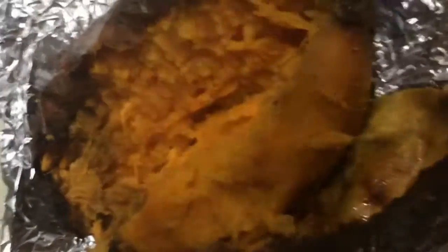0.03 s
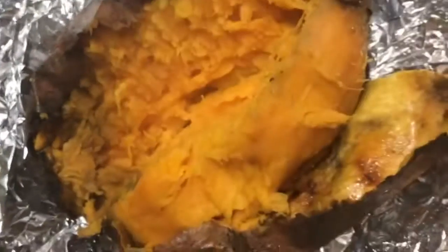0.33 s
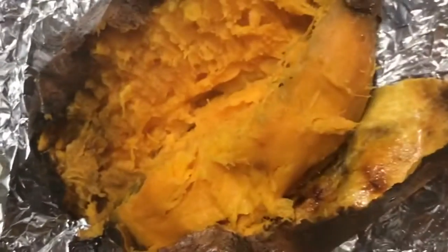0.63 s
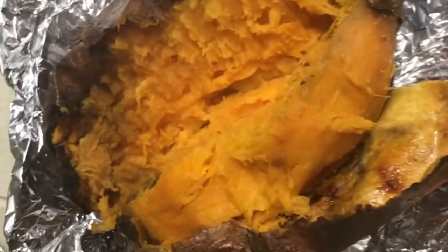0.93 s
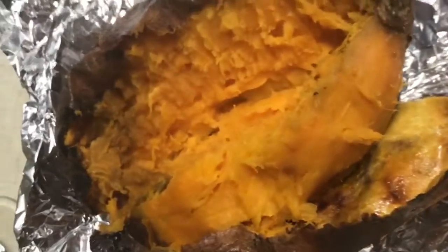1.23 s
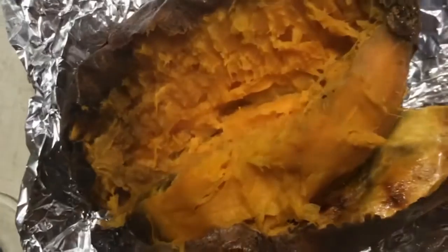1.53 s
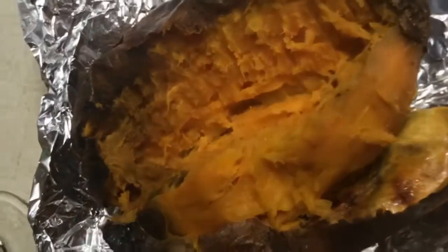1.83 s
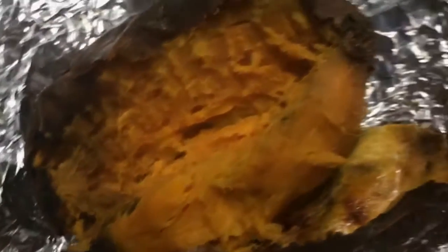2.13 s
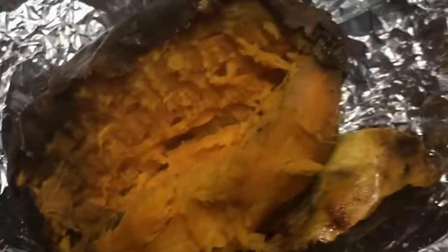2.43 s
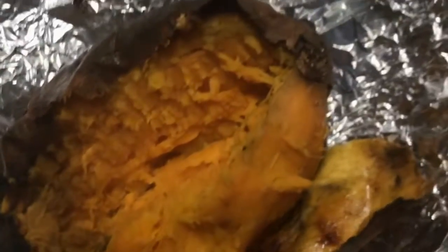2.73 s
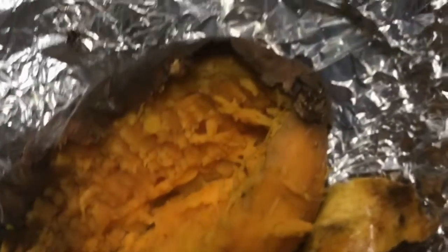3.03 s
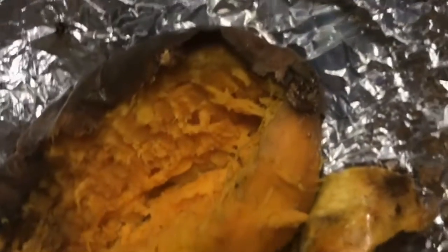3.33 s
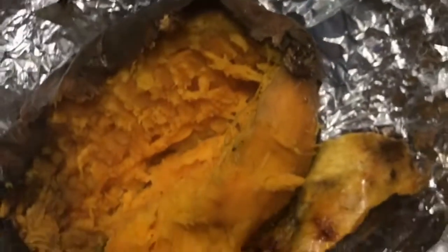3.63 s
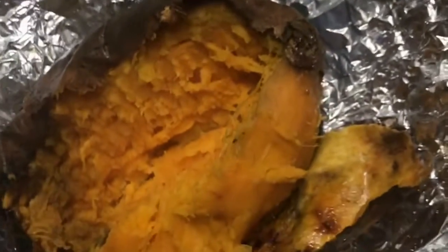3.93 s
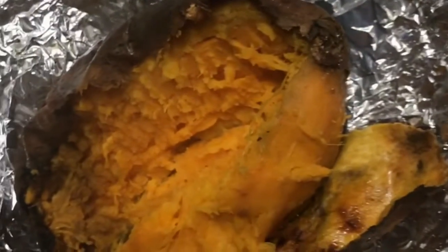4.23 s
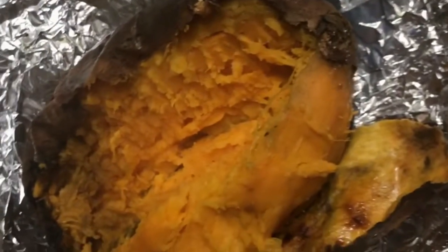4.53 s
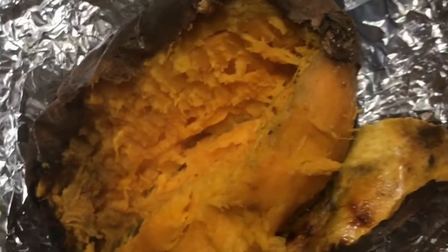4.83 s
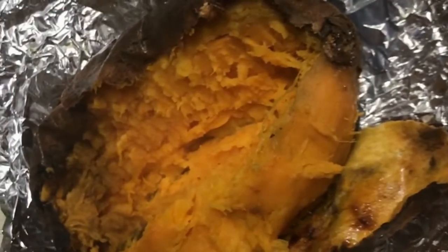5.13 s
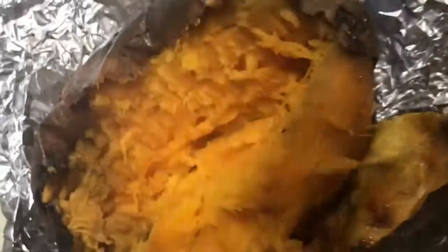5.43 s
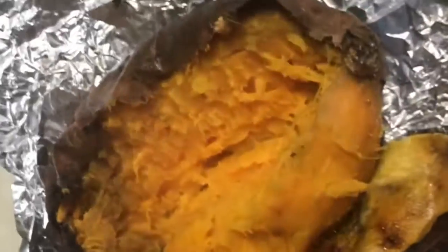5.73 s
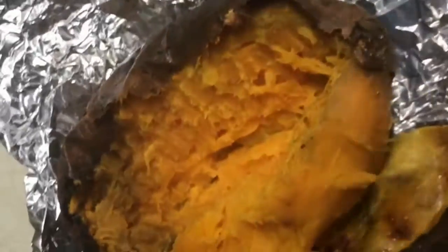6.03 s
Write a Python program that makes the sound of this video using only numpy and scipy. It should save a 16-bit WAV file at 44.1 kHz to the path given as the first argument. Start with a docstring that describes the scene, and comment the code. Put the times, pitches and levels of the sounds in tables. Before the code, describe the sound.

Soft taps, a brief foil crinkle, a fork clinking and scraping, then a dish knocks down hard on a counter over a faint hum.

```python
"""Fingers tap the case of a phone on a quiet counter. Close by, the foil around a baked potato
is pushed and crinkles as its tiny creases buckle. A steel fork clinks, scrapes and slides,
then a dish knocks down hard, rings and is nudged into place. One more faint tap follows.
An appliance hums underneath, and the room adds a short echo.
A fade time (t60) below is the time a sound takes to drop by 60 dB."""
import sys
import numpy as np
from scipy import signal
from scipy.fft import rfft, irfft, next_fast_len
from scipy.io import wavfile
from scipy.ndimage import uniform_filter1d, map_coordinates

SR = 44100
rng = np.random.default_rng(int(sys.argv[2]) if len(sys.argv) > 2 else 0)


def unload_audio(sound):
    """Save the sound as a 16-bit wav file, at the path given as the first command line argument."""
    columns = np.transpose(np.atleast_2d(sound))
    # keep every value between -1 and 1, then stretch to whole-number steps
    steps = np.round(np.clip(columns, -1, 1) * 32767)
    wavfile.write(sys.argv[1], SR, steps.astype(np.int16))


N = 273420


def foil(sheet_db=-2, flex_db=-38.5, flex_power=0.41, snap_db=-8, snap_t60=0.024):
    """Countless small creases buckle under pressure; the sheet flexes and a few big creases snap."""
    # Presses on the foil. Each row: start in seconds, length in seconds, level in dB, fade in seconds.
    presses = [(1.244, 0.031, -66.5, 0.19), (2.946, 0.097, -66, .1), (3.052, 0.034, -40.5, 0.27),
               (3.1, .064, -38, 0.17), (3.184, 0.049, -42, 0.23), (3.342, 0.11, -51, 0.44),
               (3.48, 0.037, -54.5, 0.16), (3.549, 0.076, -51.5, 0.031)]
    # The whole sheet buckles. Each row: start in seconds, length in seconds, level in dB.
    buckles = [(2.99, .012, -57.5), (3.055, 0.0097, -40.5), (3.103, .008, -49), (3.153, 0.016, -41.5)]
    # Single creases snap. Each row: start in seconds, level in dB, pitch in Hz.
    snaps = [(3.056, -23, 2350), (3.066, -22.5, 2620), (3.108, -25.5, 2200), (3.149, -31, 8600),
             (3.159, -27.5, 1560), (3.307, -41, 10800), (3.317, -39, 9000), (3.497, -39, 6300)]
    # The tone of the creases and of the sheet. Each row: frequency in Hz, level in dB.
    crackle_tone = [(530, -28), (900, -14.5), (1340, -16.5), (1940, -6.5), (2160, -9), (2650, 0.5),
                    (2850, -3.5), (3530, -2), (4030, -4.5), (8780, -6.5), (10100, -8), (14500, -8.5),
                    (15800, -9.5)]
    sheet_tone = [(53, -34), (90, -4), (259, -1.5), (302, -3), (494, -10), (673, -5), (797, -9), (1180, -5),
                  (1290, -4.5), (2600, -9), (3380, -57), (5720, -120)]
    t = np.arange(SR // 10) / SR
    crackle = shifting(coloured(grains(rate=9000, spread_db=3.5), crackle_tone), depth_db=2.8)
    sheet = coloured(grains(rate=2500, spread_db=2), sheet_tone)
    pressing = together(stroke(s, length, db, attack=0.019, t60=t60) for s, length, db, t60 in presses)
    buckling = together(stroke(s, length, db, attack=0.0046, t60=0.064) for s, length, db in buckles)
    flexing = together([buckling, amp(flex_db) * pressing ** flex_power])
    out = pressing * crackle + amp(sheet_db) * flexing * sheet
    for start, db, hz in snaps:
        crease = unit(resonate(rng.standard_normal(len(t)), [(hz, 0.47 * hz, 0)]))
        add(out, start + 0.001126, amp(db + snap_db) * crease * fade(t, snap_t60))
    return out


def dish_knocks(ring_db=-4.5, clack_db=-3.5, crack_db=6.5, crack_t60=0.02, pivot_hz=2000):
    """Each contact cracks, thuds in the counter and rings the dish and the cutlery in it."""
    # Contacts. Each row: start in seconds, level in dB, brightness in dB per octave, thud gain in dB.
    contacts = [(1.2634, -57, 2, 18.5), (4.571, -47.5, 3, -19), (4.5847, -40, 6, -12),
                (4.5923, -6, -0.5, -17.5), (4.5978, -26, 5, -10), (4.966, -46, 7.5, -20),
                (5.003, -42, -3.5, -12), (5.018, -43, -9, -20.5)]
    # How the dish and the counter ring. Each row: pitch in Hz, width in Hz, level in dB.
    dish_modes = [(549, 35, -4.5), (943, 30, -0.5), (1072.6, 21, 0.5), (1512, 26, 6), (1718, 19, -0.5),
                  (1932, 23, 5), (2060, 34, 0), (2510, 44, 8), (2870, 19, -1.5), (3330, 24, -3.5),
                  (3500, 62, -4), (3670, 15, -5), (3900, 15, -10), (4160, 24, -3), (4555, 45, -14.5),
                  (4940, 37, -10.5), (5000, 13, -15.5), (5390, 40, -7.5), (5320, 19, -20), (5560, 45, -16),
                  (6255, 17.3, -21), (6630, 15, -17), (6490, 17, -19), (6890, 45, -21.5)]
    counter_modes = [(345, 70, 3.5), (214, 18, -17.5), (639, 190, -10)]
    # Steel lying in the dish rings on. Each row: pitch in Hz, level in dB, fade in seconds.
    cutlery_modes = [(3310, -29.5, 0.31), (4635, -34, 0.055), (6464, -42, .26)]
    # The clack (tones too dense to tell apart) and the crack. Each row: frequency in Hz, level in dB.
    clack_tone = [(40, -34), (80, -14.5), (160, -16.5), (250, -14), (440, -10.5), (600, -3.5), (800, -6),
                  (1050, 8.5), (2000, -1.5), (4300, 3), (7500, -15), (11000, -24.5), (15800, -27)]
    crack_tone = [(700, -29.5), (1300, -4.5), (1900, 0.5), (2700, 3.0), (4300, -2), (5500, -12.5),
                  (7500, -23), (15000, -27)]
    # How the clack dies. Each row: frequency in Hz, fade in seconds.
    clack_fades = [(150, .09), (600, 0.11), (2000, 0.025), (5000, .045), (12000, 0.065)]
    out, t = np.zeros(N), np.arange(SR // 2) / SR
    onset = 1 - np.exp(-t / 0.0002)
    for start, db, bright_db, thud_db in contacts:
        tilt = lambda hz: amp(bright_db * np.log2(np.maximum(hz, 200) / pivot_hz))
        ring = amp(ring_db) * struck(dish_modes, tilt, t)
        thud = amp(thud_db) * struck(counter_modes, tilt, t)
        steel = ringing(cutlery_modes, t)
        clack = amp(clack_db) * dying(filtered(noise(clack_tone, len(t)), tilt), clack_fades)
        crack = noise(crack_tone, len(t)) * fade(t, crack_t60)
        crack *= amp(crack_db) / np.abs(crack).max()
        add(out, start, amp(db) * onset * (ring + thud + steel + clack + crack))
    return out


def fork_clink(tick_db=3, tick_t60=0.029, grip_t60=1.0):
    """A short steel contact leaves the fork ringing, damped a little by the hand."""
    # The contact. Each row: start in seconds, level in dB.
    clinks = [(3.858, -41)]
    # How the free fork rings. Each row: pitch in Hz, level in dB, fade in seconds.
    fork_modes = [(950, -18, 0.32), (1510, -22, 0.7), (2230, -9.5, 0.53), (3015, -12.5, 0.71),
                  (3935, -7, 0.32), (4985, -14, 0.17), (6158, -29, 0.69), (7400, -11.5, 0.1),
                  (9050, -10.5, 0.1), (9857, -28, 0.47), (12040, -27, 0.22), (13300, -33, 0.43),
                  (13730, -28, 0.24), (14650, -18, 0.12)]
    # The tick of contact. Each row: frequency in Hz, level in dB.
    tick_tone = [(100, 5), (400, 7), (1000, 1.5), (4500, -0.5), (5800, 8.5), (8000, -13), (15000, -21)]
    out, t = np.zeros(N), np.arange(SR) / SR
    for start, db in clinks:
        ring = ringing(fork_modes, t) * fade(t, grip_t60)
        tick = amp(tick_db) * noise(tick_tone, len(t)) * fade(t, tick_t60)
        add(out, start, amp(db) * (ring + tick))
    return out


def fork_scrape(rasp_db=-1, squeal_db=-4):
    """The prongs stick and slip: each slip rasps and makes them squeal."""
    # Slips. Each row: start in seconds, level in dB, fade in seconds.
    slips = [(4.071, -35.5, .09), (4.083, -27, 0.07), (4.095, -29.5, 0.087), (4.11, -30, 0.073),
             (4.120, -35, .09), (4.126, -33, 0.087)]
    # The prongs' high notes. Each row: pitch in Hz, width in Hz, level in dB.
    prong_modes = [(8110, 79, -8.5), (10060, 120, -5), (11192, 20, 3), (12200, 79, -2.5), (13300, 32, -18),
                   (14400, 49, -1), (15700, 55, 1.5)]
    # The tone of the rasp. Each row: frequency in Hz, level in dB.
    rasp_tone = [(35, -32), (60, -2.5), (85, 9), (140, -11.5), (380, -3), (730, -15), (1000, -1.5),
                 (1500, -2.5), (3300, -0.5), (6500, -8.5), (9300, -19), (12000, -12), (15000, -8),
                 (17000, -31)]
    power, t = np.zeros(N), np.arange(SR // 4) / SR
    onset = 1 - np.exp(-t / 0.00085)
    for start, db, t60 in slips:
        add(power, start, (amp(db) * fade(t, t60) * onset) ** 2)
    rasp = coloured(grains(rate=3500, spread_db=3), rasp_tone)
    squeal = unit(resonate(rng.standard_normal(N), prong_modes))
    return np.sqrt(power) * (amp(rasp_db) * rasp + amp(squeal_db) * squeal)


def fork_slide(rumble_db=-6, hiss_db=-1, uneven_db=1.64):
    """Tiny bumps in the counter rumble, hiss and make the sliding fork ring."""
    # Light slides. Each row: start in seconds, length in seconds, rubbing in dB, hiss in dB.
    slides = [(3.96, 0.045, -68, -61.5), (4.018, 0.059, -48, -58.5), (4.14, 0.084, -54.5, -62),
              (4.215, 0.064, -49, -59.5), (4.28, 0.09, -54.5, -76), (4.335, .078, -47, -59.5),
              (4.425, 0.047, -50.5, -67.5), (4.475, 0.062, -60.5, -71), (4.558, .03, -46.5, -56)]
    # The ringing while it slides. Each row: pitch in Hz, width in Hz, level in dB.
    slide_modes = [(1029, 37, -1), (1670, 170, -4), (1930, 36, -2), (2350, 130, -0.5), (2761, 120, 0.5),
                   (3540, 42, -6), (4050, 55, -9), (4503, 33, -8), (5000, 80, -15)]
    # The tone of the rumble and of the hiss. Each row: frequency in Hz, level in dB.
    rumble_tone = [(100, -12.5), (300, 1.5), (550, -5), (850, -19.5), (1600, 0.5), (2400, -1.5),
                   (3400, -9.5), (5500, -10), (8000, -23.5)]
    hiss_tone = [(3000, -18), (6500, 7), (9000, -5.5), (11500, -0.5), (12300, 4.0), (13300, -5.5),
                 (14500, 2.5), (15800, -12.5)]
    rub_gain, hiss_gain = rubbing(slides, attack=0.032, t60=0.13)
    ring = shifting(resonate(grains(rate=3000, spread_db=3), slide_modes), depth_db=4)
    rumble = amp(rumble_db) * noise(rumble_tone)
    hiss = amp(hiss_db) * shifting(noise(hiss_tone), depth_db=3.5)
    return amp(uneven_db * wobble(60)) * (rub_gain * (ring + rumble) + hiss_gain * hiss)


def dish_nudge(drag_db=-1, uneven_db=0.5):
    """The dish's foot drags over the counter."""
    # Pushes. Each row: start in seconds, length in seconds, rubbing in dB, hiss in dB.
    pushes = [(4.67, 0.08, -53.5, -71), (4.755, 0.079, -50.5, -62), (4.85, .12, -49.5, -56),
              (4.993, 0.021, -43, -50), (5.06, .23, -78, -70)]
    # The tone of the low drag and of the hiss. Each row: frequency in Hz, level in dB.
    drag_tone = [(76, -39), (130, 2.5), (166, -34), (197, -16), (286, -1.5), (500, -4), (666, -3),
                 (863, -6.5), (1050, -2.5), (4000, -9.5), (5200, -48.5), (8800, -120)]
    hiss_tone = [(1760, -26), (3000, -9), (3850, -10.5), (4050, -7.5), (4370, -1.5), (4910, -9), (5970, -4),
                 (7610, -12.5), (15800, -13)]
    drag_gain, hiss_gain = rubbing(pushes, attack=0.036, t60=0.12)
    drag = shifting(coloured(grains(rate=2500, spread_db=3), drag_tone), depth_db=2.5)
    hiss = shifting(coloured(grains(rate=5000, spread_db=3), hiss_tone), depth_db=2.5)
    return amp(uneven_db * wobble(60)) * (amp(drag_db) * drag_gain * drag + hiss_gain * hiss)


def finger_taps(spread_s=0.00123, lead_s=0.00054, soft_hz=4200):
    """Taps run through the phone's case as bending waves: the treble arrives first, the thud after."""
    # Taps. Each row: start in seconds, peak level in dB, bass cutoff in Hz.
    taps = [(.1752, -36, 40), (0.3365, -37.5, 40), (0.4328, -41.5, 100), (0.6025, -43.5, 150),
            (5.7745, -47.5, 600)]
    # How the case rings. Each row: pitch in Hz, width in Hz, level in dB.
    case_modes = [(119, 166, 4.5), (356, 360, 4), (576, 103, 6), (970, 140, -15), (1400, 150, -11),
                  (2220, 530, -19), (3860, 700, -26)]
    out, main_hz = np.zeros(N), case_modes[2][0]
    travel = lambda f: np.exp(-4j * np.pi * spread_s * np.sqrt(f * main_hz) + 2j * np.pi * f * lead_s)
    for start, db, cut_hz in taps:
        finger = lambda f: 1j * f / (cut_hz + 1j * f) / (1 + (f / soft_hz) ** 12)
        response = lambda f: body(case_modes, f) * travel(f) * finger(f)
        tap = filtered(signal.unit_impulse(SR // 10), response)
        add(out, start, amp(db) * tap / np.abs(tap).max())
    return out


def room_echo(x, build_s=0.0086):
    """Reflections from the room build up and die away."""
    # How the echo dies. Each row: frequency in Hz, fade in seconds.
    echo_fades = [(150, .45), (600, 0.2), (3000, 0.21), (7000, .25), (14000, .18)]
    t = np.arange(SR // 2) / SR
    reflections = noise([(100, 3.0), (4000, -4), (14000, -2.5)], len(t))
    tail = dying(reflections, echo_fades) * (1 - np.exp(-t / build_s))
    return signal.fftconvolve(x, tail / np.linalg.norm(tail))[:N]


def appliance(air_db=-66, rumble_db=-72, whirr_db=-82):
    """An appliance hums, rumbles and whirrs over still air."""
    # The hum's tones. Each row: pitch in Hz, average level in dB.
    hum_tones = [(59.3, -59), (119, -74.5), (7763, -90)]
    # The hush of the air. Each row: frequency in Hz, level in dB.
    air_tone = [(40, -16.5), (100, 2), (170, -1), (260, 0.5), (420, -1.5), (700, -7.5), (1000, -9.5),
                (2000, -15), (3600, -16), (5000, -21), (7000, -20.5), (10500, -25.5), (15800, -22.5)]
    # The whirr. Each row: pitch in Hz, width in Hz, level in dB.
    whirr_modes = [(3300, 300, -4), (7760, 90, -5.5), (11700, 600, -6)]
    hum, t = np.zeros(N), np.arange(N) / SR
    for hz, db in hum_tones:
        peak = amp(db + 0.5 * wobble(6)) * np.sqrt(2)
        hum += peak * np.sin(2 * np.pi * hz * t + 0.25 * wobble(5))
    air = amp(air_db) * noise([(22, -38)] + air_tone)
    rumble = amp(rumble_db) * noise([(25, -31), (50, -2), (90, -0.5), (160, -11.5), (500, -61)])
    whirr = amp(whirr_db + 1.3 * wobble(3)) * unit(resonate(rng.standard_normal(N), whirr_modes))
    return hum + air + rumble + whirr


def amp(db):
    """Turn decibels into a gain."""
    return 10 ** (np.asarray(db) / 20)


def unit(x):
    """Scale x to an average power of 1."""
    return x / np.sqrt(np.mean(x ** 2) + 1e-20)


def along(points, hz):
    """Read between (Hz, value) points on a log frequency axis."""
    f, values = np.transpose(points)
    return np.interp(np.log(hz + 1), np.log(f + 1), values)


def fade(t, t60):
    """Die away by 60 dB every t60 seconds."""
    return np.exp(-np.log(1000) * t / t60)


def add(track, start, sound):
    """Mix a sound in at a start time in seconds."""
    part = track[round(start * SR):][:len(sound)]
    part += sound[:len(part)]


def wobble(rate):
    """A smooth curve through rate random points a second."""
    return map_coordinates(rng.standard_normal(int(N * rate / SR) + 4), [np.arange(N) * rate / SR])


def filtered(x, response):
    """Scale and delay each frequency of x as the response says."""
    size = next_fast_len(len(x) + SR // 4)
    return irfft(rfft(x, size) * response(np.fft.rfftfreq(size, 1 / SR)), size)[:len(x)]


def coloured(x, spectrum):
    """Shape x with a (Hz, dB) curve, at power 1."""
    return unit(filtered(x, lambda hz: amp(along(spectrum, hz))))


def noise(spectrum, samples=N):
    """Smooth noise shaped by a (Hz, dB) curve."""
    return coloured(rng.standard_normal(samples), spectrum)


def body(modes, f):
    """How an object answers frequency f; its modes are the notes it rings at."""
    return sum((-1) ** k * amp(db) * 1j * f * width / (hz * hz - f * f + 1j * f * width)
               for k, (hz, width, db) in enumerate(modes))


def resonate(x, modes):
    """Let x shake an object with these modes."""
    return filtered(x, lambda f: body(modes, f))


def sine(hz, t):
    """A pure tone starting anywhere in its cycle."""
    return np.sin(2 * np.pi * (hz * t + rng.random()))


def ringing(modes, t):
    """Struck steel: each tone fades at its own pace."""
    return sum(amp(db) * fade(t, t60) * sine(hz, t) for hz, db, t60 in modes)


def struck(modes, tilt, t):
    """Ringing after a blow: a wide mode starts strong and dies fast."""
    total = np.linalg.norm([amp(db) * width for _, width, db in modes])
    return sum(amp(db) * width / total * tilt(hz) * np.exp(-np.pi * width * t) * sine(hz, t)
               for hz, width, db in modes)


def grains(rate, spread_db):
    """Tiny clicks of random size, about rate of them a second."""
    clicks = (rng.random(N) < rate / SR) * rng.choice([-1, 1], N)
    return unit(clicks * amp(spread_db * np.minimum(rng.standard_normal(N), 2)))


def dying(x, fades):
    """Each frequency of x dies with its own fade time."""
    hz, t, bands = signal.stft(x, SR, nperseg=128)
    return signal.istft(bands * fade(t, along(fades, hz)[:, None]), SR, nperseg=128)[1][:len(x)]


def shifting(x, depth_db):
    """The tone drifts in random patches as the contact or the folds change shape."""
    bands = signal.stft(x, nperseg=512)[2]
    patches = uniform_filter1d(rng.standard_normal(bands.shape), size=5, axis=0)
    patches = uniform_filter1d(patches, size=9, axis=1)
    return unit(signal.istft(bands * amp(depth_db * unit(patches)), nperseg=512)[1][:len(x)])


def stroke(start, length, db, attack, t60):
    """Gain of one hand movement: it gathers speed for attack seconds, holds, then dies away."""
    out, t = np.zeros(N), np.arange(SR) / SR
    rise = np.sin(np.pi / 2 * np.minimum(t / attack, 1))
    add(out, start, amp(db) * rise * fade(np.maximum(t - length, 0), t60))
    return out


def together(strokes):
    """Overlapping movements add in power."""
    return np.sqrt(sum(gain ** 2 for gain in strokes))


def rubbing(rows, attack, t60):
    """Rubbing and hiss gains of a series of strokes."""
    return (together(stroke(s, length, db, attack, t60) for s, length, db, _ in rows),
            together(stroke(s, length, db, attack, t60) for s, length, _, db in rows))


def scene():
    """Mix to one channel; only the foil, fork and dish echo in the room."""
    near = foil() + fork_clink() + fork_scrape() + fork_slide() + dish_nudge() + dish_knocks()
    return (near + amp(-15) * room_echo(near) + finger_taps() + appliance())[None]


def record(dry):
    """The phone rounds off peaks at full scale and drops the highest treble."""
    top_hz = 15900
    limited = dry[0] / (1 + np.abs(dry[0]) ** 8) ** (1 / 8)
    return filtered(limited, lambda hz: 1 / (1 + (hz / top_hz) ** 200))[None]


dry = scene()
out = record(dry)
unload_audio(out)
```